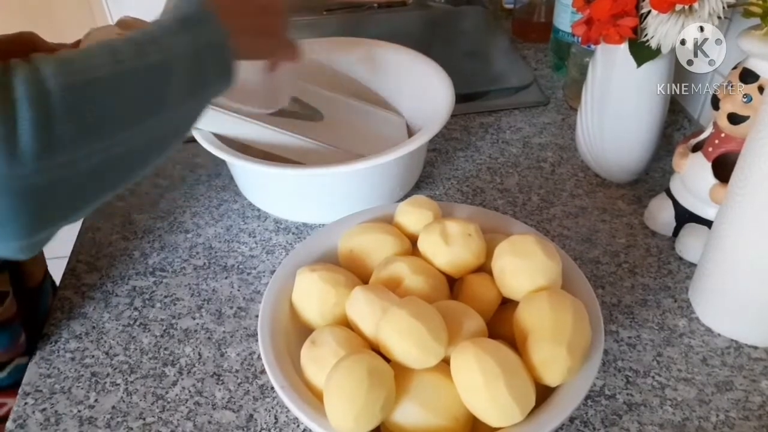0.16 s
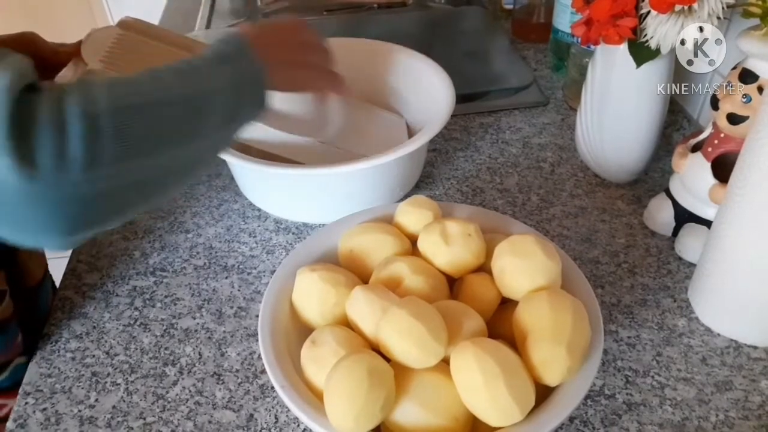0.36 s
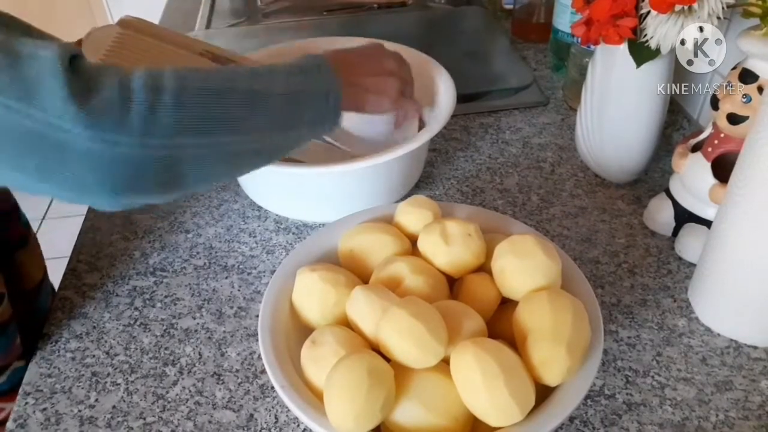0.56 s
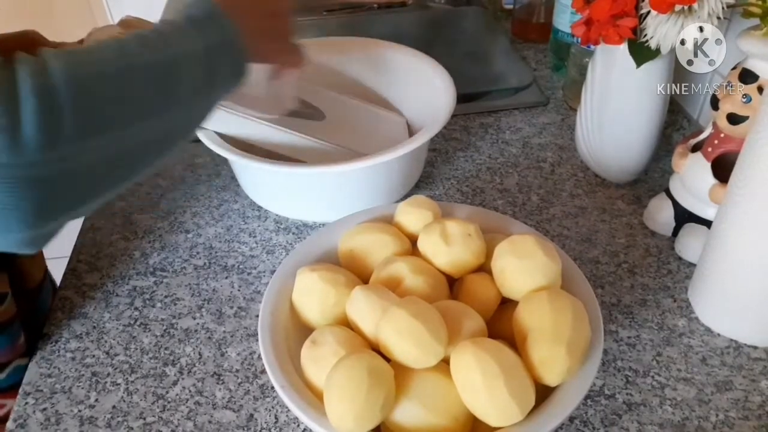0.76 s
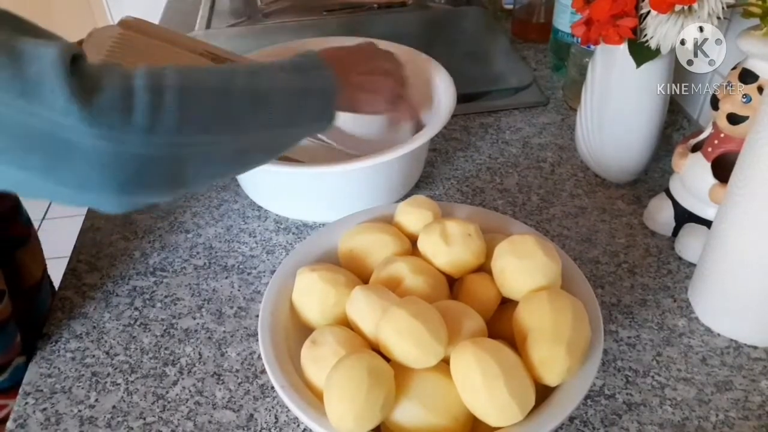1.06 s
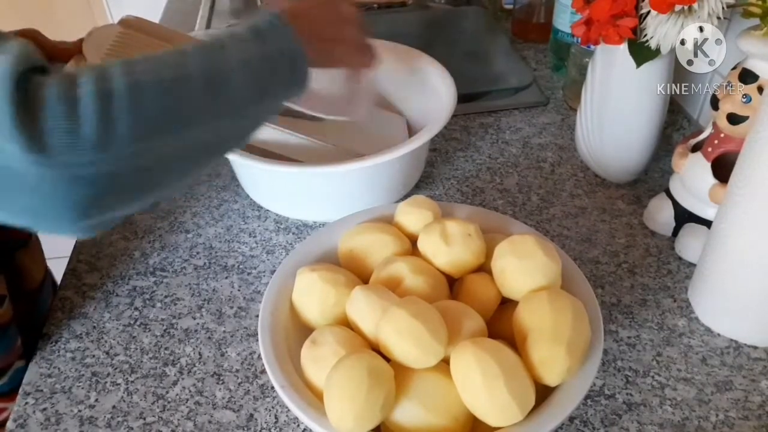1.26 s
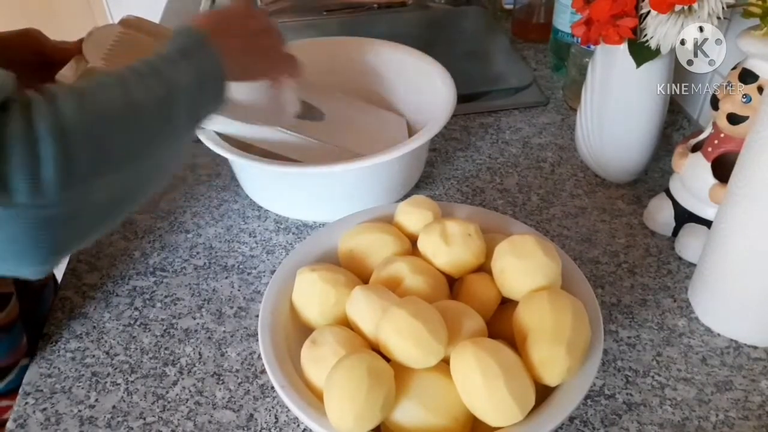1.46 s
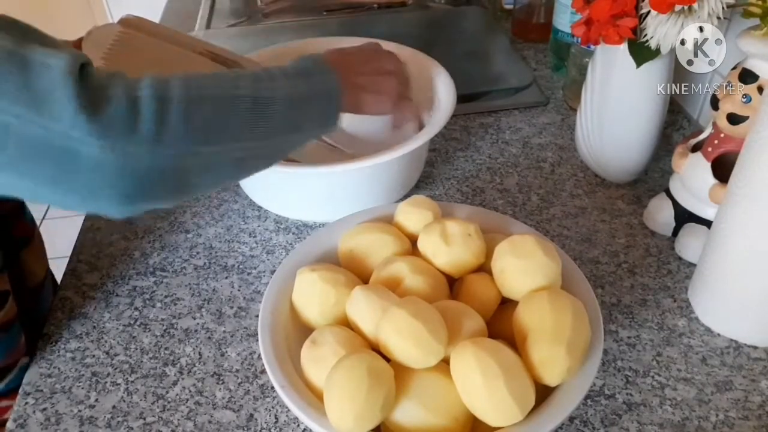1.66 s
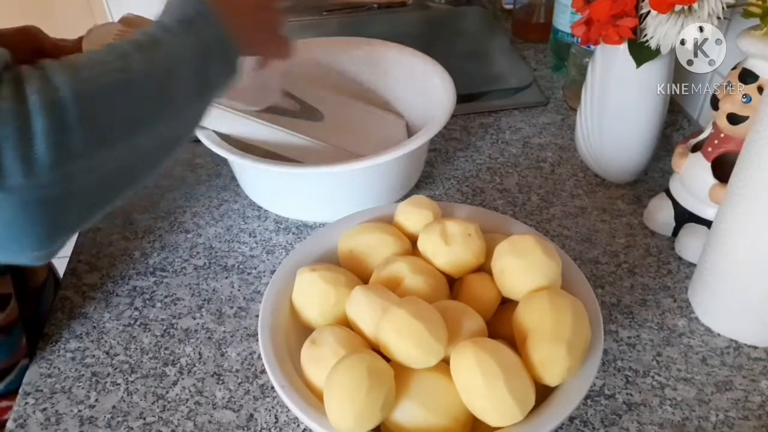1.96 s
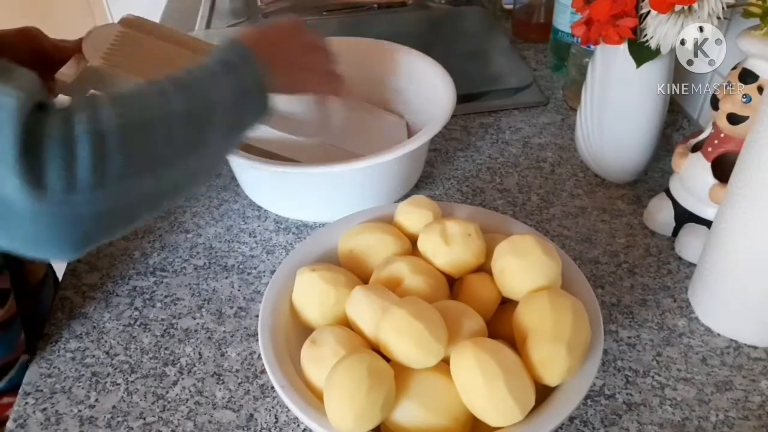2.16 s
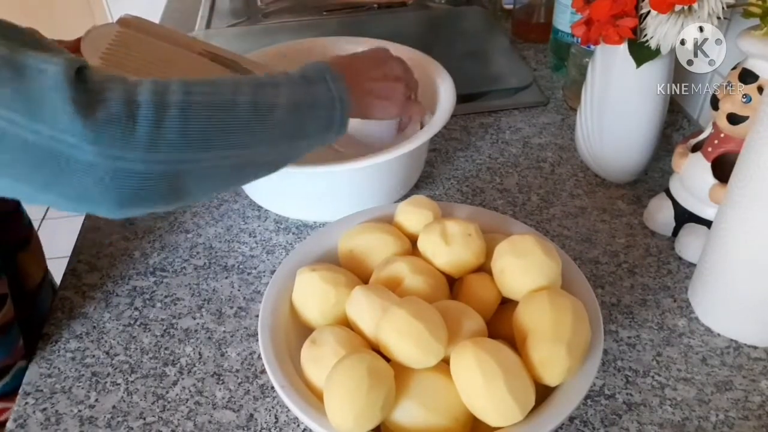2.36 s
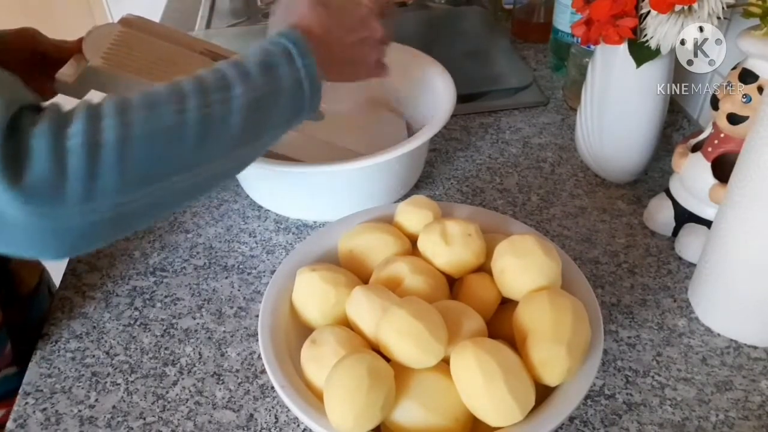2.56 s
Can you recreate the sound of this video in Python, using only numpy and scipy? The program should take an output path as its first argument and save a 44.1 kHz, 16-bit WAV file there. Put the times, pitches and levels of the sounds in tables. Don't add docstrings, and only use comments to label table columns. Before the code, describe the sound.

A potato is pushed over a slicer resting on a plastic bowl, four quick rounds of hard clack, short wet scrape and hollow knock, with loose rattling, in a small kitchen, close stereo phone microphone.

```python
import sys
import numpy as np
from scipy import signal
from scipy.fft import rfft, irfft, next_fast_len
from scipy.io import wavfile
from scipy.ndimage import uniform_filter1d, map_coordinates

SR = 44100
rng = np.random.default_rng(int(sys.argv[2]) if len(sys.argv) > 2 else 0)


def to_wav(sig):
    pcm = np.clip(np.atleast_2d(sig), -1, 1) * 32767
    pcm = np.round(pcm).astype(np.int16)
    wavfile.write(sys.argv[1], SR, pcm.T)


def undo_db(level):
    steps = np.asarray(level, float) / 20
    return 10 ** steps


N = 119070
STEADY_TOP_HZ, TOP_HZ = 15650, 16500
RING_S = 0.4


def unit(x):
    return x / np.sqrt(np.mean(x ** 2) + 1e-20)


def along(points, hz):
    f, v = np.transpose(points)
    return np.interp(np.log(hz + 1), np.log(f + 1), v)


def filtered(x, response):
    n = x.shape[-1]
    m = next_fast_len(n + 8192)
    return irfft(rfft(x, m) * response(np.fft.rfftfreq(m, 1 / SR)), m)[..., :n]


def noise_pair(n=N):
    return rng.standard_normal((2, n))


def wobble(rate):
    knots = rng.standard_normal(int(N * rate / SR) + 4)
    return map_coordinates(knots, [np.arange(N) * rate / SR])


# (frequency [Hz], likeness [0-1])
LIKENESS = [(60, .93), (250, 0.94), (1000, 0.33), (4000, 1), (12000, 0.11)]


def pair(x, response):
    def mid_side(hz):
        turn = np.arccos(np.clip(along(LIKENESS, hz), -1, 1)) / 2
        return response(hz) * np.array([np.cos(turn), np.sin(turn)])

    mid, side = filtered(x, mid_side)
    return np.array([mid + side, mid - side])


def coloured(x, curve, top_hz=np.inf):
    return unit(pair(x, lambda hz: undo_db(along(curve, hz)) * (hz < top_hz)))


# (frequency [Hz], t60 [s])
KITCHEN_DECAY = [(100, 0.88), (500, 0.28), (2000, 0.4), (6000, 0.26), (14000, 0.22)]


def kitchen(x):
    hz, t, z = signal.stft(noise_pair(round(RING_S * SR)), SR, nperseg=256)
    z = z * undo_db(-60 * t / along(KITCHEN_DECAY, hz)[:, None])
    tail = signal.istft(z, SR, nperseg=256)[1]
    tail = pair(tail / np.linalg.norm(tail[0]), lambda hz: (hz < STEADY_TOP_HZ) * hz / (hz + 500))
    late = np.pad(x, (130, 0))
    return signal.fftconvolve(late[None], tail, axes=1)[:, :len(x)]


def ring(modes, t, rise_s, scatter_db):
    hz, db, t60 = np.transpose(modes)[:, :, None]
    a, b = rng.standard_normal((2, len(modes), 1))
    decay = undo_db(db + scatter_db * a - 60 * t / t60)
    tones = decay * np.sin(2 * np.pi * hz * (1 + 0.012 * b) * t)
    return tones.sum(0) * (1 - np.exp(-t / rise_s))


def thump(t, level_db):
    tone = np.sin(2 * np.pi * 345 * (t - 0.0007))
    swell = np.sin(np.pi * np.minimum(t / 0.012, 1))
    return undo_db(level_db - 3 * np.array([[1], [-1]])) * tone * swell


# (frequency [Hz], level [dB], t60 [s])
BOWL_MODES = [(57, -13, 0.28), (106.9, -2, 0.27), (192.7, 1, 0.29), (242.4, -1, 0.19), (329.7, 5, 0.081),
              (376.5, 2, 0.14), (460.4, -10.5, 0.14), (549, -8.5, 0.1), (594, -1.5, 0.07), (746, -1, 0.094)]


def strikes(rows, modes, ring_db, crack, crack_db, crack_t60, rattle_db, rattle_t60, rise_s, room_db,
            top_hz=STEADY_TOP_HZ):
    out, t = np.zeros((2, N + SR)), np.arange(round(RING_S * SR)) / SR
    rise = 1 - np.exp(-t / rise_s)
    rattle_rise = 1 - np.exp(-t / 0.0011)
    for s, db, boom_db, *thump_db in rows:
        snap = coloured(noise_pair(len(t)), crack, top_hz)
        rattle = coloured(noise_pair(len(t)), crack, STEADY_TOP_HZ)
        body = undo_db(ring_db) * ring(modes, t, rise_s, scatter_db=1.5)
        boom = undo_db(boom_db - 14.0) * ring(BOWL_MODES, t, rise_s=0.0044, scatter_db=2.5)
        near = body + boom
        near = near + rattle * undo_db(rattle_db - 60 * t / rattle_t60) * rattle_rise
        near = near + snap * undo_db(crack_db - 60 * t / crack_t60) * rise
        for level_db in thump_db:
            near = near + thump(t, level_db)
        wet = kitchen(near[1])
        out[:, round(s * SR):][:, :len(t)] += undo_db(db) * (near + undo_db(room_db) * wet)
    return out[:, :N]


# (frequency [Hz], level [dB per Hz])
ROOM_HUM = [(24, -44.5), (40, 2.5), (287, -5.5), (496, -13), (3840, -27.5), (5580, -24.5), (15500, -25.5)]
# (start [s], length [s], centre [Hz], width [Hz], level [dB])
FAR_WHISTLE = (1.86, .18, 5500, 350, -78)


def stillness():
    s, length, c_hz, w_hz, db = FAR_WHISTLE
    hum = coloured(noise_pair(), ROOM_HUM, STEADY_TOP_HZ)
    whistle = unit(pair(noise_pair(), lambda hz: np.exp(-((hz - c_hz) / w_hz) ** 2)))
    u = np.clip((np.arange(N) / SR - s) / length, 0, 1)
    return undo_db(-71.5 + 2.8 * wobble(24.0)) * hum + undo_db(db) * np.sin(np.pi * u) * whistle


# (start [s], length [s], level [dB], board drone [dB])
STROKES = [(-.1, 0.39, -72.5, 0.5), (0.216, 0.21, -47.5, -3), (0.325, 0.2, -39, -3.5),
           (0.495, 0.15, -51.5, 7), (0.614, 0.4, -60, -2), (0.865, 0.086, -50.5, 0.5),
           (0.911, 0.18, -37.5, -6), (1.106, 0.12, -64.5, 19.5), (1.386, 0.15, -44, -0.5),
           (1.466, 0.23, -44, -0.5), (1.703, 0.1, -56.5, 11.5), (2.022, 0.16, -46, 4),
           (2.115, 0.2, -38.5, -5.5), (2.349, 0.12, -57.5, 16)]
# (frequency [Hz], level [dB per Hz])
WET_HISS = [(180, -1.5), (300, -9.5), (624, -2.5), (856, -10), (1430, -4.5), (2030, -10.5), (3640, -6.5),
            (12300, -10), (16000, -13)]
# (frequency [Hz], level [dB per Hz])
RIB_SCRAPE = [(600, -28), (1400, -0.5), (2500, -3.5), (6000, -8), (10000, -25.5)]
# (frequency [Hz], level [dB per Hz])
COUNTER_RUMBLE = [(25, -29), (50, -27), (110, -8), (200, -18), (400, -83.5)]
# (frequency [Hz], level [dB per Hz])
FIBRE_CRUNCH = [(250, -47.5), (500, 1), (1100, 8), (1700, -15), (2600, 2), (5000, -24.5)]
# (frequency [Hz], width [Hz], level [dB])
BOARD_MODES = [(110, 40, -3), (194, 60, 0), (330, 90, -6), (600, 90, -9), (1420, 90, -11), (1620, 80, -10),
               (2250, 200, -15)]


def board(hz):
    total = 0
    for k, (c, w, db) in enumerate(BOARD_MODES):
        total = total + (-1) ** k * undo_db(db) * 1j * hz * w / (c * c - hz * hz + 1j * hz * w)
    return total


def slides():
    t, speed, drone = np.arange(N) / SR, np.zeros(N), np.zeros(N)
    for s, length, db, drone_db in STROKES:
        u = (t - s) / length
        ramp = np.minimum(u / 0.3, (1 - u) / 0.48)
        shape = np.sin(np.pi / 2 * np.clip(ramp, 0, 1)) ** 2
        speed = speed + undo_db(db) * shape
        drone = drone + undo_db(db + drone_db) * shape
    grains = noise_pair() * undo_db(2 * np.minimum(rng.exponential(1, (2, N)), 4))
    hiss = unit(pair(grains, lambda hz: undo_db(along(WET_HISS, hz)) * (hz > 250) * (hz < STEADY_TOP_HZ)))
    hits = (rng.random(N) < 900 / SR) * undo_db(4 * rng.standard_normal(N))
    catches = noise_pair() * uniform_filter1d(hits, size=24)
    hiss = hiss + undo_db(-8) * coloured(catches, RIB_SCRAPE)
    rumble = coloured(noise_pair(), COUNTER_RUMBLE)
    hum = unit(pair(noise_pair() * undo_db(4 * wobble(70)), board))
    crunch = coloured(noise_pair() * undo_db(6.7 * wobble(120)), FIBRE_CRUNCH)
    body = hum + undo_db(-7.5) * rumble + undo_db(-6.5) * crunch
    dry = speed * undo_db(1.5 * wobble(60)) * hiss
    dry = dry + undo_db(2.0) * drone * undo_db(0.93 * wobble(25.62)) * body
    return filtered(dry + undo_db(-5.0) * kitchen(dry[0]), lambda hz: hz < STEADY_TOP_HZ)


# (time [s], peak level [dB], bowl boom [dB])
SOFT_THUDS = [(.001, -47.5, 23.5), (.06, -65.5, 30), (.235, -32.5, 3.5), (.367, -50, 20), (.53, -34, 19),
              (.68, -54.5, 21), (.7, -64.5, 13.5), (.828, -29, -12), (1.115, -30.5, 4.5), (1.16, -40, 11.5),
              (1.25, -70, 14), (1.415, -34, -11.5), (1.513, -50, 25.5), (1.713, -33.5, -7),
              (2.044, -36, 17.5), (2.154, -38, 18), (2.335, -36, 3), (2.405, -42.5, -2)]
# (frequency [Hz], level [dB], t60 [s])
DECK_MODES = [(193.4, -12, 0.23), (293, -2, 0.36), (612, -3.5, 0.12), (1140, -3.5, 0.054)]
# (frequency [Hz], level [dB per Hz])
SOFT_PUFF = [(80, 9), (200, 6.5), (500, 11), (1100, -6.5), (2000, -22.5), (5000, -18.5), (16000, -46)]


def thuds():
    return strikes(SOFT_THUDS, DECK_MODES, 0, SOFT_PUFF, crack_db=0.97, crack_t60=0.077,
                   rattle_db=-0.54, rattle_t60=0.24, rise_s=0.0016, room_db=-2.0)


# (time [s], peak level [dB], bowl boom [dB])
RIM_BOUNCES = [(.045, -59, -16), (.232, -42, -21), (.247, -21, -20), (.526, -24, -19.5), (.541, -30, -20),
               (.565, -46, -17), (.83, -23, -18.5), (.8365, -23, -22), (.85, -19, -18),
               (.877, -23.5, -17.5), (1.12, -31.5, -27), (1.176, -37, -22.5), (1.254, -50, -20.5),
               (1.273, -53, -21), (1.401, -31, -22), (1.428, -28, -22), (1.525, -30, -19),
               (1.714, -20, -24), (1.74, -37, -26), (2.031, -22.5, -25), (2.048, -35, -22.5),
               (2.055, -32.5, -21.5), (2.062, -22.5, -20), (2.075, -23.5, -17), (2.152, -30.5, -18.5),
               (2.165, -31, -19), (2.189, -36.5, -18.5), (2.215, -41.5, -19), (2.398, -36.5, -25.5)]
# (frequency [Hz], level [dB], t60 [s])
RIM_MODES = [(367, -0.5, .03), (556, -4.5, .035), (624, -1.5, 0.056), (775, -4, 0.022), (1045, -5.5, .025)]


def chatter():
    return strikes(RIM_BOUNCES, RIM_MODES, -4.5, SOFT_PUFF, crack_db=-4.5, crack_t60=0.045,
                   rattle_db=-16, rattle_t60=0.05, rise_s=0.0016, room_db=-10)


# (time [s], peak level [dB], bowl boom [dB])
HOLDER_ROCKS = [
    (.13, -62, -4),
    (.445, -39, 3),
    (.529, -32.5, -5),
    (.685, -49.5, 4),
    (1.699, -33.5, -13.5),
    (2.255, -36, 10),
    (2.3875, -25.5, 0.5),
    (2.399, -25, 7),
    (2.416, -28, -9.5),
    (2.433, -36, -15.5),
]
# (frequency [Hz], level [dB], t60 [s])
RIB_MODES = [(1640, 0, .02), (1900, -3, .018), (2150, -8, .018), (3700, -14, .012)]
# (frequency [Hz], level [dB per Hz])
RIB_PUFF = [(150, -28.5), (400, -7.5), (1000, -9), (1700, 3), (2300, -5.5), (4000, -11), (16000, -36)]


def rocks():
    return strikes(HOLDER_ROCKS, RIB_MODES, 3, RIB_PUFF, crack_db=-15, crack_t60=0.027,
                   rattle_db=-16.5, rattle_t60=0.11, rise_s=0.00055, room_db=-11)


# (time [s], peak level [dB], bowl boom [dB])
SKIN_SNAPS = [
    (.2117, -17, -37),
    (.2188, -18, -38),
    (.5112, -17.5, -40),
    (.8222, -24.5, -40),
    (1.0985, -27.5, -43),
    (1.3942, -18, -40),
    (1.6878, -23, -40.5),
    (2.0172, -25, -40),
    (2.3132, -28, -41.5),
]
# (frequency [Hz], level [dB per Hz])
WET_CRACK = [(1000, -17), (4000, -5), (8000, 1.5), (14000, -4.5), (16500, -11)]
# (frequency [Hz], level [dB], t60 [s])
TOP_MODES = [(594, -8, .08), (1150, -8, .03), (2400, -6, .014), (2800, 0, .013), (3400, -3, .012),
             (4200, -8, .01)]


def snaps():
    return strikes(SKIN_SNAPS, TOP_MODES, -59, WET_CRACK, crack_db=0.5, crack_t60=0.0098,
                   rattle_db=-9.5, rattle_t60=0.03, rise_s=0.00046, room_db=-13, top_hz=TOP_HZ)


# (time [s], peak level [dB], bowl boom [dB])
FIRST_TOUCHES = [
    (.2122, -26, -15.5),
    (.8092, -25, 4.5),
    (1.3935, -23, -25),
    (2.0162, -21.5, -10),
]
# (frequency [Hz], level [dB per Hz])
BRIGHT_CRACK = [(300, -33.5), (1000, 2.5), (3000, 4), (6000, -4), (9000, -1), (14000, -13.5), (17000, -17)]


def ticks():
    return strikes(FIRST_TOUCHES, TOP_MODES, -29, BRIGHT_CRACK, crack_db=-0.78, crack_t60=0.04,
                   rattle_db=-9.5, rattle_t60=0.009, rise_s=0.00017, room_db=-3.5)


# (time [s], peak level [dB], bowl boom [dB])
TOP_CLACKS = [
    (.2185, -13, -4),
    (.8218, -15, -6.5),
    (1.3962, -16.5, 2.5),
    (2.0195, -17.5, -5.5),
]
# (frequency [Hz], level [dB per Hz])
TOP_CRACK = [(240, -29.5), (400, 1.5), (687, 8), (949, 1.5), (2250, 9), (8630, -5), (16000, -14)]


def clacks():
    return strikes(TOP_CLACKS, TOP_MODES, -3, TOP_CRACK, crack_db=-3.5, crack_t60=0.022,
                   rattle_db=-10, rattle_t60=0.12, rise_s=0.001, room_db=-3)


# (time [s], peak level [dB], bowl boom [dB], hollow thump [dB])
STOP_KNOCKS = [
    (.5112, -10.5, -5, -3.5),
    (1.0988, -15, -0.5, -10.5),
    (1.6878, -14, -1.5, -1.5),
    (2.3132, -15, 2, -8),
]
# (frequency [Hz], level [dB], t60 [s])
STOP_MODES = [(1600, -13, .022), (1890, 5, .012), (2190, -12, .028), (3070, -9, .01), (3600, -4, .01)]
# (frequency [Hz], level [dB per Hz])
STOP_CRACK = [(530, -54.5), (900, -13.5), (1920, 1.5), (3820, -7), (4410, -15.5), (11800, -22.5),
              (16000, -30.5)]


def knocks():
    return strikes(STOP_KNOCKS, STOP_MODES, 0, STOP_CRACK, crack_db=-14, crack_t60=0.056,
                   rattle_db=-13, rattle_t60=0.17, rise_s=0.001, room_db=-12)


# (time [s], peak level [dB], bowl boom [dB])
HIGH_BOUNCES = [
    (.845, -28.5, -32.5),
    (.862, -37.5, -28.5),
    (1.42, -30, -26.5),
    (1.435, -28.5, -30),
    (2.034, -34, -31),
    (2.047, -26.5, -31.5),
    (2.058, -30, -29.5),
]
# (frequency [Hz], level [dB], t60 [s])
HIGH_RIM_MODES = [(1060, 3.5, .04), (1129, 8, 0.041)]


def high_chatter():
    return strikes(HIGH_BOUNCES, HIGH_RIM_MODES, -1.8, FIBRE_CRUNCH, crack_db=-19.5, crack_t60=0.02,
                   rattle_db=-18, rattle_t60=0.05, rise_s=0.0022, room_db=-5.5)


def scene():
    contacts = thuds() + chatter() + rocks() + snaps() + ticks() + clacks() + knocks() + high_chatter()
    return stillness() + slides() + contacts


def top_cut(x):
    return signal.sosfilt(signal.butter(12, 16600, fs=SR, output="sos"), x)


# (frequency [Hz], level difference [dB])
LEFT_LEAN = [(60, -3), (180, -4), (550, -1), (1650, -1), (4970, -1.0), (15000, -2)]
# (frequency [Hz], phase [rad])
LEFT_LEAD = [(60, 0.08), (300, 0.55), (1000, 1.46), (2500, 1.33), (6000, 1.58), (15000, 0.53)]
# (frequency [Hz], level [dB per Hz])
MIC_HISS = [(1500, -32), (4000, 0), (7000, 1.5), (15500, -4)]


def record(dry):
    def ports(hz):
        half = np.log(undo_db(along(LEFT_LEAN, hz))) / 2 + 0.5j * along(LEFT_LEAD, hz)
        bass_cut = (1j * hz / (1j * hz + 70)) ** 2
        return np.exp([half, -half]) * bass_cut * (hz < TOP_HZ)

    x = filtered(dry, ports)
    power = np.abs(uniform_filter1d((x ** 2).mean(0), round(0.09 * SR)))
    x = x * undo_db(-6.5 / (1 + power / undo_db(2 * -53.5)))
    hiss = filtered(noise_pair(x.shape[1]), lambda hz: undo_db(along(MIC_HISS, hz)) * (hz < STEADY_TOP_HZ))
    mix = x + undo_db(-83) * unit(hiss)
    return top_cut(mix)


dry = scene()
out = record(dry)
to_wav(out)
```